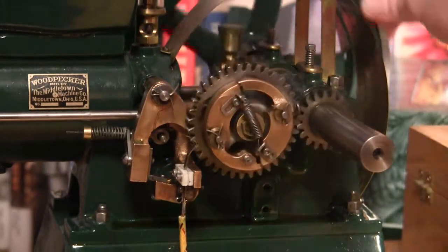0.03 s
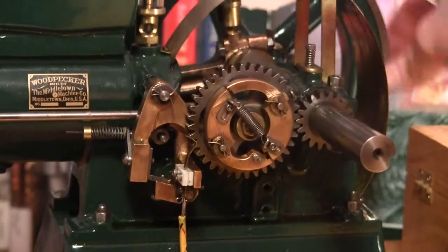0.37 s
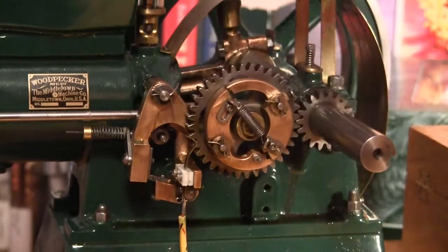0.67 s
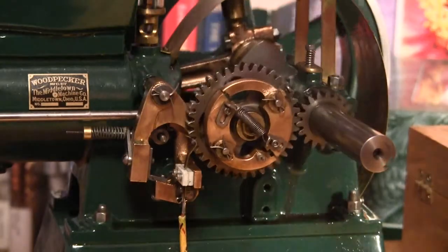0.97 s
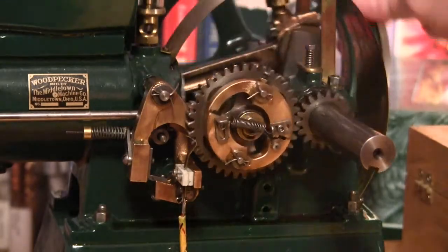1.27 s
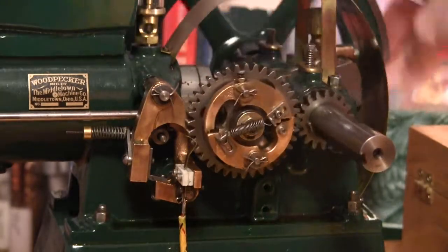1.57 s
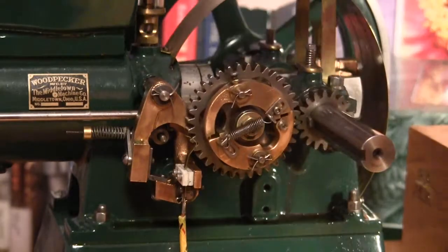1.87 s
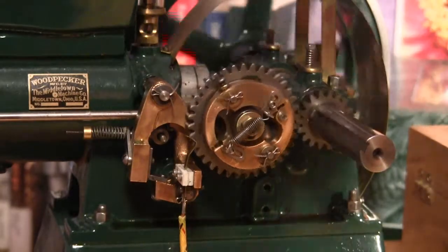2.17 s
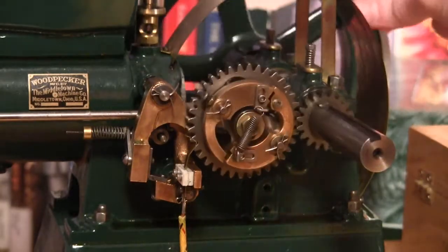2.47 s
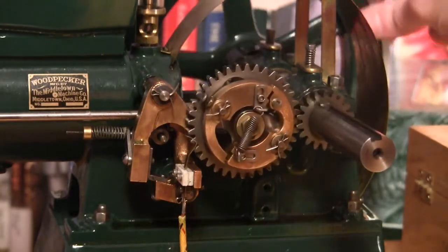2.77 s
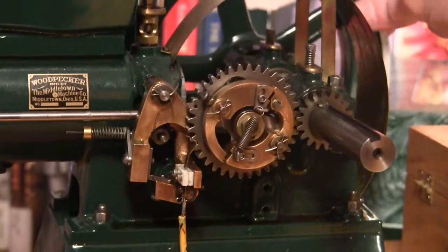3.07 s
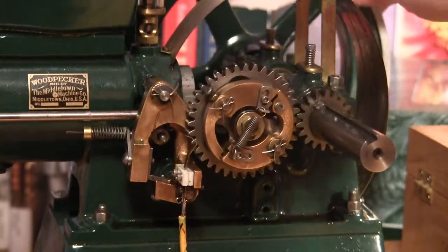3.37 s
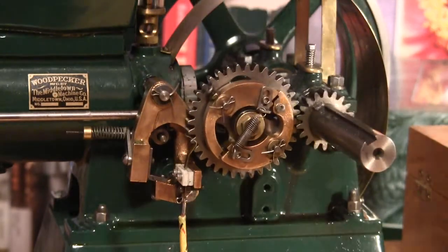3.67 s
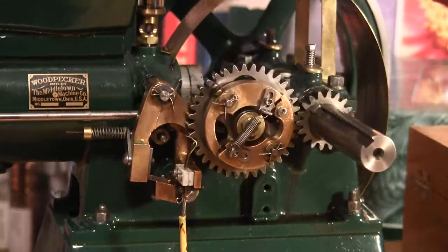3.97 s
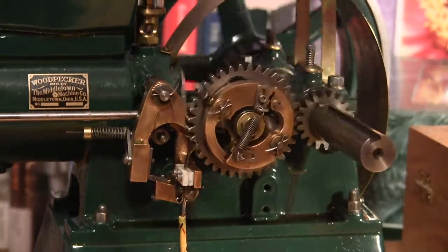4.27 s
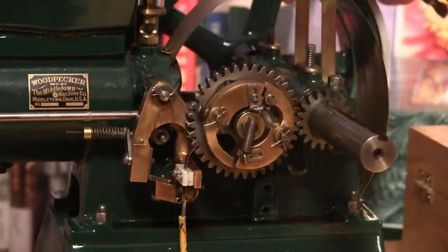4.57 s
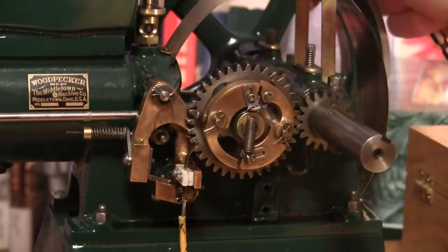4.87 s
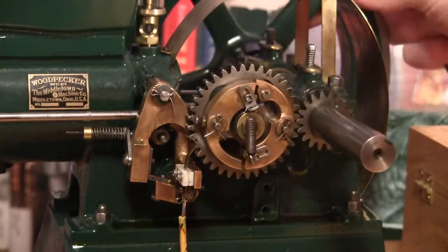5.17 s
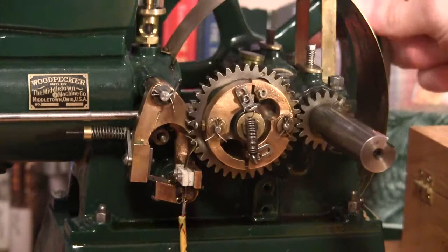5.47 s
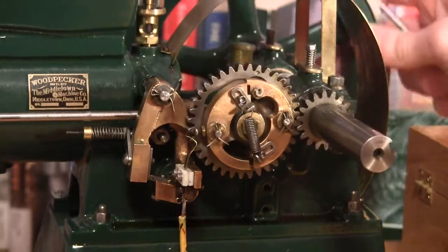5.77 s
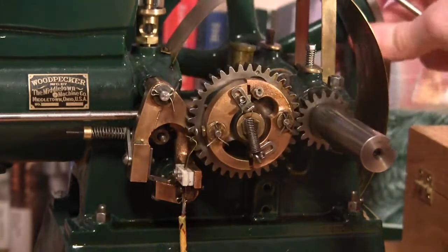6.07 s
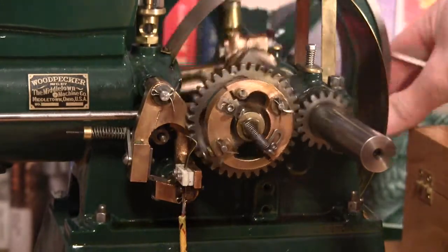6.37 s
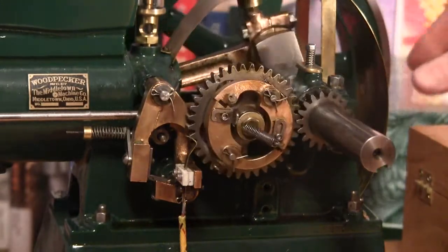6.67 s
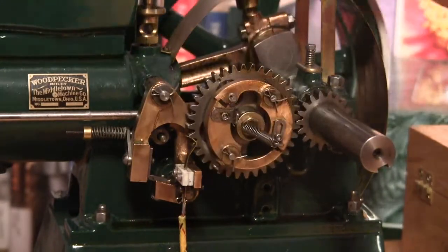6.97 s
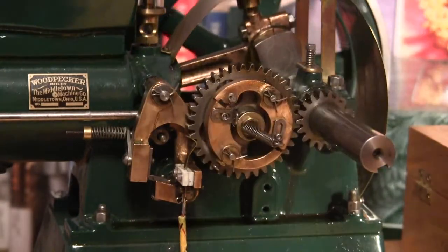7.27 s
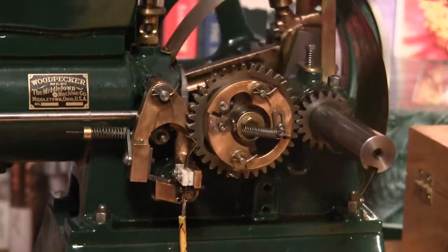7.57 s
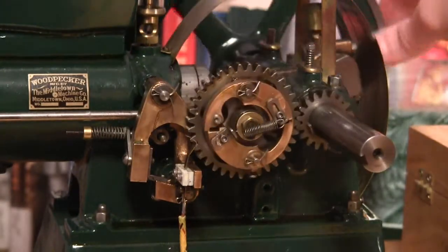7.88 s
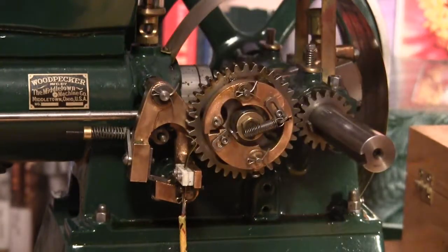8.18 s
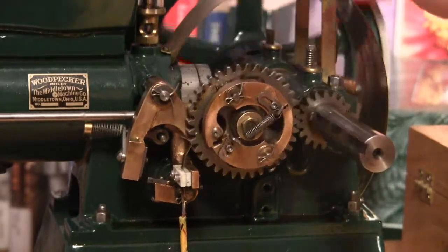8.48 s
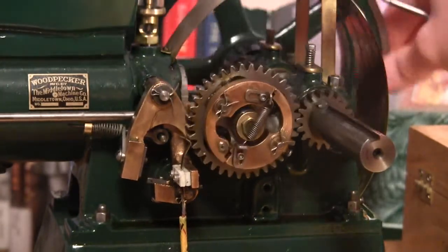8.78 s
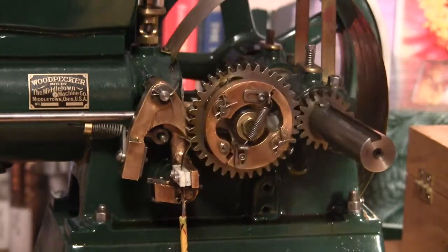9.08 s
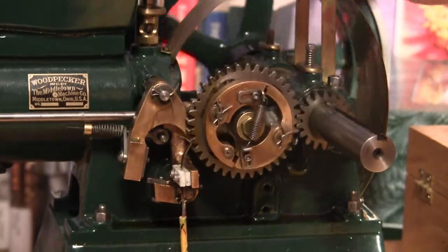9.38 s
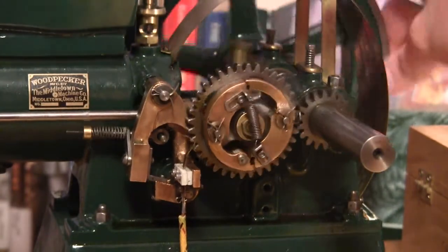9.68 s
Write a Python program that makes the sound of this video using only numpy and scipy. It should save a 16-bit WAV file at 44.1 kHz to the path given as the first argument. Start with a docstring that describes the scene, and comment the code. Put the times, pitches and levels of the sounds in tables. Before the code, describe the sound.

A model engine is slowly hand-turned, giving scattered metal clacks, brief gear rattles and a sharp snap in a quiet room.

```python
"""A small gas engine turned by hand

A model engine turns slowly, close by in a quiet room. Each impact is a brief force that sets a part
ringing in its damped modes: gear teeth knock across their backlash, the push rod clacks, a spring pings
and the igniter trips with one loud snap. Oiled parts rub, over mains hum, a fan and a faint clock."""
import sys
import numpy as np
from scipy import signal
from scipy.fft import rfft, irfft
from scipy.io import wavfile
from scipy.ndimage import uniform_filter1d

SR = 44100
rng = np.random.default_rng(int(sys.argv[2]) if len(sys.argv) > 2 else 0)


def int16_out(signal):
    """Quantize to a 16-bit WAV file."""
    q = np.round(np.clip(np.atleast_2d(signal).T, -1, 1) * 32767)
    wavfile.write(sys.argv[1], SR, q.astype(np.int16))


N = 433944

# spectrum of light contact between metal parts: frequency_hz, gain_db
LIGHT_METAL_SPECTRUM = [(500, -9), (2000, 3.5), (3800, -15), (5500, -0.5), (7000, -4.5), (10000, 0.5),
                        (14000, -15)]
# stereo width, as side relative to mid: frequency_hz, gain_db
SIDE_SPECTRUM = [(60, -39), (125, -42), (250, -17), (600, -7.5), (1500, -10), (3000, -8), (5000, -36)]


def amp(db):
    """Amplitude ratio of a level in decibels."""
    return 10 ** (np.asarray(db) / 20)


def unit_rms(x):
    """Normalisation to a mean power of 1."""
    return x / np.sqrt(np.mean(x ** 2) + 1e-20)


def unit_energy(x):
    """Normalisation to a total energy of 1."""
    return x / (np.linalg.norm(x) + 1e-20)


def curve_at(points, hz):
    """Linear interpolation on a logarithmic frequency axis."""
    point_hz, value = np.transpose(points)
    return np.interp(np.log(hz + 1), np.log(point_hz), value)


def add(mix, start_s, sound):
    """Superposition: a sound adds to the mix from its start time on."""
    part = mix[max(round(start_s * SR), 0):][:len(sound)]
    part += sound[:len(part)]


def filtered(x, spectrum):
    """Zero-phase filtering by a spectrum in decibels."""
    gain = amp(curve_at(spectrum, np.fft.rfftfreq(len(x), 1 / SR)))
    return irfft(rfft(x) * gain, len(x))


def noise(spectrum):
    """Gaussian noise of unit power, shaped by a spectrum."""
    return unit_rms(filtered(rng.standard_normal(N), spectrum))


def drifting_tone(hz, drift_cycles):
    """Phase modulation: a sinusoid of unit power wanders slowly in phase."""
    drift = unit_rms(signal.resample(rng.standard_normal(30), N))
    return np.sqrt(2) * np.sin(2 * np.pi * (hz * np.arange(N) / SR + drift_cycles * drift))


def minimum_phase(gain_db):
    """Minimum phase gives the most compact causal pulse that has a given spectrum."""
    log_gain = np.log(amp(np.r_[gain_db, gain_db[-2:0:-1]]))
    pulse = np.fft.ifft(np.exp(np.conj(signal.hilbert(log_gain)))).real
    return pulse[:len(pulse) // 2]


def friction(swells, spectrum, gain_db, grain_db):
    """Friction noise: surface roughness makes a grainy hiss, here in short Gaussian swells."""
    t = np.arange(N) / SR
    envelope = sum(amp(db) * np.exp(-((t - centre_s) / half_s) ** 2) for centre_s, db, half_s in swells)
    hiss = rng.standard_normal(N)
    roughness = unit_rms(uniform_filter1d(rng.standard_normal(N), size=100))
    grains = hiss * amp(grain_db * roughness)
    return amp(gain_db) * envelope * unit_rms(filtered(grains, spectrum))


def impacts(contacts, spectrum, modes, gain_db, ring_db, chatter_db, chatter_s, contact_s,
            bass_hz=500, treble_hz=3000, spot_db=8):
    """Modal synthesis: each contact is a force pulse with chatter, followed by damped free vibration."""
    out, t = np.zeros(N), np.arange(SR // 2) / SR
    hz = np.fft.rfftfreq(4096, 1 / SR) + 1
    bass_shelf = 1 / (1 + (hz / bass_hz) ** 2)
    treble_shelf = 1 - 1 / (1 + (hz / treble_hz) ** 2) ** 2
    radiation_db = -10 * np.log10(1 + (130 / (hz + 10)) ** 4)  # small parts radiate little bass
    push = np.exp(-(t / contact_s - 2) ** 2)  # the longer the contact, the duller the push
    spot_octaves, ring_rise_s = 0.17, 0.00094
    for start_s, level_db, bass_db, treble_db, *spot_hz in contacts:
        timbre_db = bass_db * bass_shelf + treble_db * treble_shelf
        # a struck spot with a pitch adds a broad resonance of its own
        timbre_db += sum(spot_db / (1 + (np.log2(hz / f) / spot_octaves) ** 2) for f in spot_hz)
        chatter = unit_energy(rng.standard_normal(len(t)) * t * np.exp(-t / chatter_s))
        force = push / push.sum() + amp(chatter_db) * chatter
        response = minimum_phase(curve_at(spectrum, hz) + timbre_db + radiation_db)
        blow = signal.fftconvolve(force, response)[:len(t)]
        ring = np.zeros(len(t))
        for mode_hz, mode_db, t60_s in modes:
            decay = amp(mode_db + np.interp(mode_hz, hz, timbre_db) - 60 * t / t60_s)
            ring += decay * np.sin(2 * np.pi * (mode_hz * t + rng.random()))  # phase varies by contact
        ring *= 1 - np.exp(-t / ring_rise_s)
        strike = unit_energy(blow) + amp(ring_db) * unit_energy(ring)
        add(out, start_s, amp(level_db + gain_db) * strike)
    return out


def reverberation(build_s=0.0044):
    """Diffuse reflections build up quickly, then decay exponentially at each band's own rate."""
    # reverberation time: frequency_hz, t60_s
    decay_times = [(150, 0.38), (500, 0.3), (1500, 0.22), (4000, 0.28), (8000, 0.23), (14000, 0.16)]
    hz, frame_s, bands = signal.stft(rng.choice([-1., 1.], SR // 2), SR, nperseg=256)
    decay = amp(-60 * frame_s / curve_at(decay_times, hz)[:, None])
    tail = signal.istft(bands * decay, SR, nperseg=256)[1]
    t = np.arange(len(tail)) / SR
    return unit_energy(tail * (1 - np.exp(-(t / build_s) ** 2)))


def in_room(x, wet_db, echo_db):
    """Convolution with direct sound, early reflections and reverberation gives mid and side."""
    # reflections from the table top and near walls: delay_s, level_db
    echoes = [(.0036, -19), (.0074, -15), (.0098, -19), (.0137, -21)]
    mid = amp(wet_db) * reverberation()
    mid[0] += 1  # direct sound
    for delay_s, level_db in echoes:
        add(mid, delay_s, amp([level_db + echo_db]))
    side = amp(wet_db) * filtered(reverberation(), SIDE_SPECTRUM)
    return np.array([signal.oaconvolve(x, path)[:N] for path in (mid, side)])


def fan(rush_db=-52.5):
    """Turbulent air gives broadband noise and rotation gives faint tones; returns mid and side."""
    # fan tones: pitch_hz, level_db
    lines = [(215.3, -66.5), (430.7, -64.5), (538.3, -67.5)]
    # spectral density of rushing air: frequency_hz, gain_db
    rush = [(88, -45), (150, -28), (203, 0), (309, -6.5), (346, -4.5), (426, -8.5), (496, -8.5),
            (535, -11.5), (3440, -27.5), (13000, -34), (14000, -45)]
    # spectral density of the low rumble: frequency_hz, gain_db
    rumble = [(15, -5), (35, -6.5), (70, 1.5), (100, -3.5), (160, 5.5), (220, -19), (400, -37)]
    tones = sum(amp(db) * drifting_tone(hz, drift_cycles=0.19) for hz, db in lines)
    mid = tones + amp(rush_db) * noise(rush) + amp(-61) * noise(rumble)
    side = filtered(amp(rush_db) * noise(rush) + amp(-47) * noise(rumble), SIDE_SPECTRUM)
    return np.array([mid, side])


def mains_hum(pitch_hz=120):
    """Magnetic vibration at twice the mains frequency makes a hum, which swells and fades."""
    # envelope of the hum: time_s, level_db
    levels = [(0.0, -59), (0.05, -53), (1.09, -51.5), (1.29, -67.5), (1.53, -52.5), (2.03, -52.5),
              (2.74, -65), (3.26, -53.5), (4.41, -56.5), (4.74, -65), (4.96, -55), (5.62, -65), (6.6, -53),
              (9.84, -54.5)]
    envelope = amp(np.interp(np.arange(N) / SR, *np.transpose(levels)))
    return envelope * drifting_tone(pitch_hz, drift_cycles=0.032)


def clock(first_s=0.6744, half_length_s=0.03):
    """Temporal smearing: distance blurs a clock's ticks, one a second, into soft rustles."""
    # spectrum of a tick: frequency_hz, gain_db
    spectrum = [(400, 1), (1200, 6), (2000, 1.5), (2450, 1.5), (3250, -5), (3650, -2), (4000, -10),
                (13000, -21.5)]
    beats = [(first_s + k, 0, half_length_s) for k in range(10)]
    return friction(beats, spectrum, gain_db=-54, grain_db=1)


def sliding_parts():
    """Sliding friction: oiled parts rub with a darker noise, dry metal with a brighter one."""
    # oiled parts sliding: centre_s, level_db, half_length_s
    oiled_slides = [(.765, -61.5, 0.03), (1.477, -58.5, 0.018), (2.68, -58.5, 0.021)]
    # spectrum of oiled friction: frequency_hz, gain_db
    oiled_spectrum = [(300, 2.5), (900, 12), (1400, -3), (2400, -1), (3600, -10), (5000, -12), (13000, -27)]
    # dry metal brushing: centre_s, level_db, half_length_s
    dry_slides = [(.835, -79.5, 0.043), (6.495, -72, 0.027), (6.555, -76, 0.042)]
    return (friction(oiled_slides, oiled_spectrum, gain_db=7, grain_db=6)
            + friction(dry_slides, LIGHT_METAL_SPECTRUM, gain_db=20.5, grain_db=-2))


def loose_parts():
    """Very brief contacts excite the high modes of small loose parts."""
    # fine ticks: start_s, level_db, bass_db, treble_db
    ticks = [(6.3725, -49, -6, 4), (6.448, -44.5, -6, 12), (6.531, -43.5, -4, 14), (6.559, -40.5, 4, -7),
             (8.494, -46, 12, -23)]
    # modes of the parts: pitch_hz, level_db, t60_s
    modes = [(2150, 2, 0.07), (6160, -1, 0.06), (8600, 6, 0.054), (11000, 0, 0.07)]
    return impacts(ticks, LIGHT_METAL_SPECTRUM, modes, gain_db=23.5, ring_db=-5.5,
                   chatter_db=0, chatter_s=0.0014, contact_s=0.00003)


def spring():
    """Slipping coils excite lightly damped modes, which ring on as a ping."""
    # coil slips: start_s, level_db, bass_db, treble_db
    slips = [(1.6245, -41.5, -1, 25), (1.633, -42, -1, -4), (1.655, -46, -4, -2), (1.676, -47, -14, 20),
             (6.537, -46.5, -16, 32), (8.8465, -43.5, -5, 22)]
    # spectrum of a slip: frequency_hz, gain_db
    spectrum = [(500, 15), (2100, 5), (3500, -4.5), (4500, 3), (6200, -8.5), (8300, 3), (9500, -9),
                (11500, -10), (14000, -43)]
    # spring modes: pitch_hz, level_db, t60_s
    modes = [(4370, 3, .26), (4596, -3, .22), (4790, 1.5, .38), (8220, 2, .22), (8646, -6, .14),
             (10350, -2, .25)]
    return impacts(slips, spectrum, modes, gain_db=22.5, ring_db=-2,
                   chatter_db=21, chatter_s=0.0036, contact_s=0.00004)


def latch():
    """Heavy damping of a single mode leaves only a thin tick as the latch settles."""
    # latch contacts: start_s, level_db, bass_db, treble_db
    ticks = [(4.011, -38.5, 10, 3), (5.202, -50.5, 10, -1), (9.7305, -39.5, -3, -4)]
    # spectrum of a contact: frequency_hz, gain_db
    spectrum = [(300, -15), (1500, -9), (2100, -3), (2650, 1), (3300, -8), (4000, -16), (6000, -12),
                (9000, -24), (14000, -42)]
    # latch mode: pitch_hz, level_db, t60_s
    modes = [(2720, 0, 0.0057)]
    return impacts(ticks, spectrum, modes, gain_db=18.5, ring_db=-1,
                   chatter_db=4, chatter_s=0.0022, contact_s=0.00005)


def lever():
    """Inharmonic modes make a clink as a lever drops on its seat."""
    # the drop: start_s, level_db, bass_db, treble_db
    drops = [(8.5045, -28, -7, -4.5)]
    # spectrum of the contact: frequency_hz, gain_db
    spectrum = [(200, -17), (500, -8), (750, -28), (950, 2), (1130, 6), (1350, -17), (1600, -1),
                (2200, -29), (5500, -30), (7000, -18), (8200, -15), (9000, -30), (10500, -20), (12200, -23),
                (14000, -45)]
    # lever modes: pitch_hz, level_db, t60_s
    modes = [(980, -1, .1), (1045, -1, 0.082), (1140, -7, 0.088), (1630, -5, 0.13), (7760, -22, .18)]
    return impacts(drops, spectrum, modes, gain_db=22.5, ring_db=-14,
                   chatter_db=5, chatter_s=0.0018, contact_s=0.0001)


def frame(rock_s=0.02):
    """Longer contacts sound dull: the frame bumps its base, then rocks back softer and lower."""
    # bumps of the frame: start_s, level_db, bass_db, treble_db, pitch_hz
    bumps = [(1.581, -46.5, -7, -29, 587), (2.517, -45, -3, 3, 680), (3.922, -36.5, 8, -16, 395),
             (4.788, -43, 28, -23, 211), (5.931, -29, -14, -12, 350), (6.44, -34, 6, 10, 740),
             (6.454, -34.5, 15, -17, 413), (6.51, -36.5, -15, -11, 774), (6.5164, -26, 6, 2.5, 790),
             (7.304, -44.5, 23, -4, 150), (8.523, -44, 14, -20, 230)]
    # spectrum of a bump: frequency_hz, gain_db
    spectrum = [(80, -19), (170, -3.5), (400, -3), (800, -8.5), (1400, -14), (2200, -17.5), (3800, -34),
                (10000, -38), (14000, -45)]
    # modes of the base: pitch_hz, level_db, t60_s
    modes = [(217, -2.5, 0.49), (290, -8, 0.4), (450, 4, 0.032)]
    contacts = []
    for start_s, level_db, bass_db, treble_db, pitch_hz in bumps:
        contacts.append((start_s, level_db, bass_db, treble_db, pitch_hz))
        contacts.append((start_s + rock_s, level_db - 3, bass_db + 3.5, treble_db, pitch_hz * 0.54))
    return impacts(contacts, spectrum, modes, gain_db=25.5, ring_db=-7,
                   chatter_db=9, chatter_s=0.0022, contact_s=0.00018, spot_db=9)


def push_rod(rebound_s=0.0074, rebound_hz=1450):
    """Elastic rebound: the rod takes up its play, springs back and lands again, duller."""
    # clacks of rod on latch: start_s, level_db, bass_db, treble_db, pitch_hz, rebound_db
    clacks = [(.156, -28, 14, -20, 950, -4), (2.09, -36, -22, -31, 1510, 0),
              (2.1484, -27, -26, -22, 1800, -1), (2.564, -37, 14, -17, 1170, -10),
              (2.862, -42, 13, -29, 1160, -17), (5.157, -40, 19, -21, 905, -9),
              (6.988, -41.5, 19, -18, 940, -12), (8.395, -30.5, -4, -13, 1700, 0.5),
              (9.5978, -18.5, 10.5, 12.5, 1350, -3)]
    # spectrum of a clack: frequency_hz, gain_db
    spectrum = [(150, -35), (400, -11.5), (700, -9), (900, -4), (1100, -6), (1450, -3.5), (1850, -2),
                (2300, -5.5), (2800, -8.5), (3300, -9), (4000, -20), (5300, -11.5), (6500, -19),
                (8500, -25), (13000, -56)]
    # rod modes: pitch_hz, level_db, t60_s
    modes = [(882, -8.5, 0.065), (1415, -3, 0.03), (1822, 0.5, 0.028), (3254, -5.5, 0.026),
             (5350, -2, 0.018)]
    contacts = []
    for start_s, level_db, bass_db, treble_db, pitch_hz, rebound_db in clacks:
        contacts.append((start_s, level_db, bass_db, treble_db, pitch_hz))
        contacts.append((start_s + rebound_s, level_db + rebound_db, bass_db, treble_db - 10, rebound_hz))
    return impacts(contacts, spectrum, modes, gain_db=17.5, ring_db=-4.5,
                   chatter_db=9, chatter_s=0.0013, contact_s=0.0001, bass_hz=890)


def gears(first_gap_s=0.061, shortest_gap_s=0.034, run_s=0.3):
    """Backlash lets teeth collide, singly or in runs that quicken as the flywheel gathers speed."""
    # single teeth meeting: start_s, level_db, bass_db, treble_db
    knocks = [(.4122, -24, -8, -7), (3.919, -27, -3.5, -4.5), (6.6345, -23, -10, -1)]
    # rattles as the flywheel falls over its top: start_s, level_db, spare_gap_ratio
    runs = [(1.0826, -24.5, .39), (7.5395, -30.5, .72)]
    # spectrum of a knock: frequency_hz, gain_db
    spectrum = [(100, -3), (200, -2.5), (480, -1.5), (720, -6), (1000, -3), (1290, 7.5), (1600, 1.5),
                (2100, -8.5), (2950, -4), (4000, -5.5), (4600, -7), (7000, -13), (11000, -8.5),
                (13000, -38)]
    # gear modes: pitch_hz, level_db, t60_s
    modes = [(1216, -9, 0.044), (1400, -2, 0.015), (2977, -14.5, 0.078)]
    contacts = list(knocks)
    for start_s, level_db, spare_gap_ratio in runs:
        gaps_s = shortest_gap_s + (first_gap_s - shortest_gap_s) * spare_gap_ratio ** np.arange(10)
        delays_s = np.r_[0, np.cumsum(gaps_s)]
        for delay_s in delays_s[delays_s < run_s]:
            closure = (delay_s / run_s) ** 1.98  # knocks grow fainter and thinner as the backlash closes
            contacts.append((start_s + delay_s, level_db - 25.5 * closure, 0.5, -6.5 + 27 * closure))
    return impacts(contacts, spectrum, modes, gain_db=18, ring_db=-12,
                   chatter_db=-14, chatter_s=0.0032, contact_s=0.0001, treble_hz=2400)


def igniter(rattle_start_s=5.924, rattle_s=0.06, count=10, low_hz=600, high_hz=2700):
    """A hard impact excites many modes: the igniter slams on its stop and the linkage rattles on."""
    # the trip and the slam: start_s, level_db, bass_db, treble_db, pitch_hz
    snaps = [(5.8966, -14.5, -9, -13.5, 2480), (5.917, -9, 10.5, 6, 2110)]
    # spectrum of a snap: frequency_hz, gain_db
    spectrum = [(120, -29), (240, -7.5), (450, -4), (900, -4), (1500, 1.5), (1950, -5.5), (2400, 3),
                (3100, -8), (3750, -8.5), (4100, -1), (4900, -1.5), (6300, -19), (7800, -4), (9500, -11),
                (12000, -11), (14000, -19)]
    # igniter modes: pitch_hz, level_db, t60_s
    modes = [(901, -1, .16), (1198, -3, .2), (1246, -2, .2), (1550, -4, .2), (1754, -1, .2),
             (2260, -7, .16), (2422, -6, .17), (2513, -5, .17), (4043, -8, .25), (4280, -14, .25),
             (4791, -5, .22), (5319, -9, .18), (7601, -8, .16), (7763, -11, .15), (8231, -10, .18),
             (10350, -13, .22)]
    contacts = list(snaps)
    for k in range(count):  # each contact of the rattle is fainter and at another spot
        progress = (k + rng.random()) / count
        pitch_hz = low_hz * (high_hz / low_hz) ** rng.random()
        contacts.append((rattle_start_s + rattle_s * progress, -22 - 17 * progress, 0, -8, pitch_hz))
    return impacts(contacts, spectrum, modes, gain_db=21, ring_db=-10.5,
                   chatter_db=6, chatter_s=0.0023, contact_s=0.0001, spot_db=10)


def scene():
    """The sources superpose in the room; the sum and difference of mid and side give left and right."""
    light_parts = sliding_parts() + loose_parts() + spring() + latch() + push_rod()
    mid, side = (fan()
                 + in_room(clock(), wet_db=-3.5, echo_db=-10)
                 + in_room(light_parts, wet_db=-8.5, echo_db=-5.5)
                 + in_room(lever() + frame(), wet_db=-6.5, echo_db=0.5)
                 + in_room(gears(), wet_db=-4, echo_db=5.5)
                 + in_room(igniter(), wet_db=-7, echo_db=-3))
    mid += mains_hum()
    return np.array([mid + side, mid - side])


def record(dry):
    """Band limiting: a steep low-pass filter removes the highest treble."""
    low_pass = signal.firwin(511, 13950, window=("kaiser", 9), fs=SR)
    return signal.oaconvolve(dry, low_pass[None], "same")


dry = scene()
out = record(dry)
int16_out(out)
```